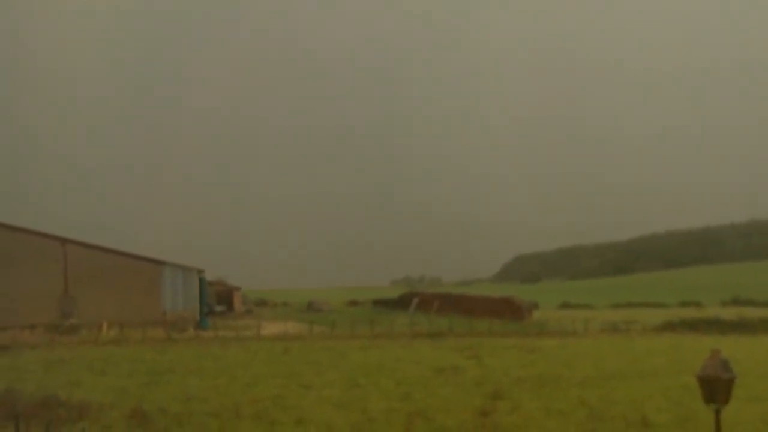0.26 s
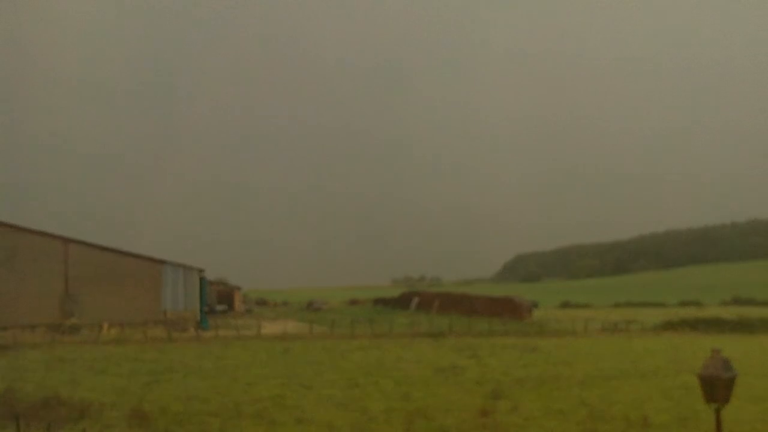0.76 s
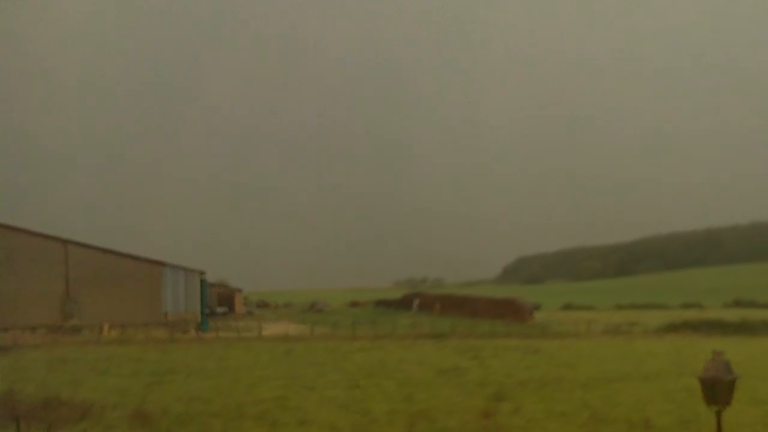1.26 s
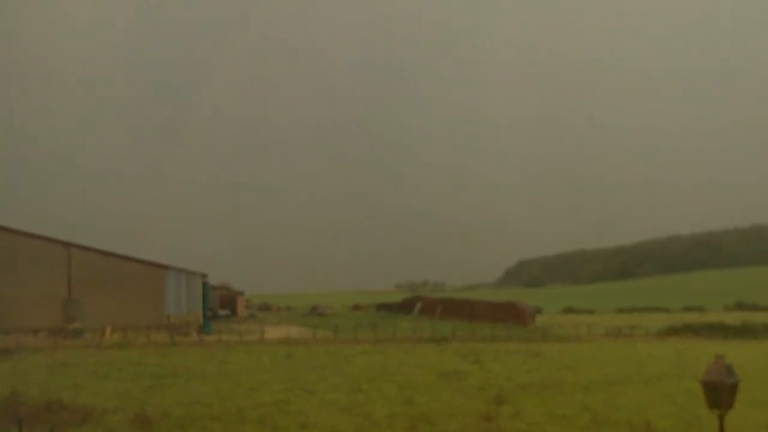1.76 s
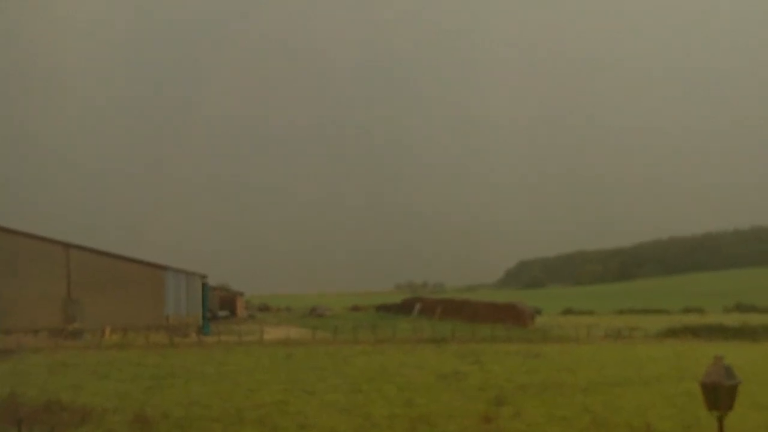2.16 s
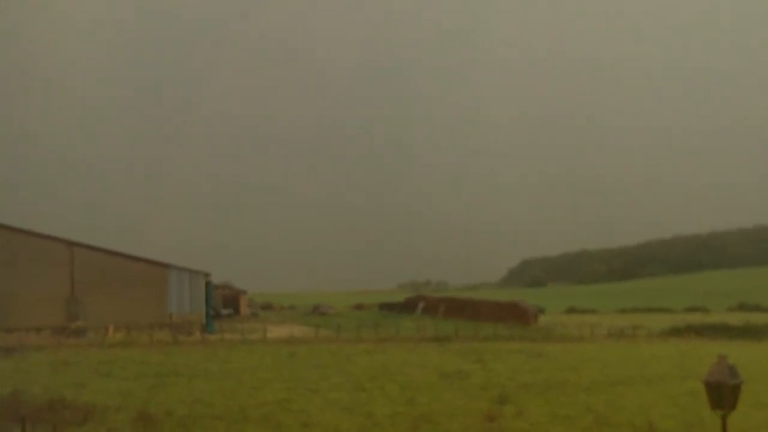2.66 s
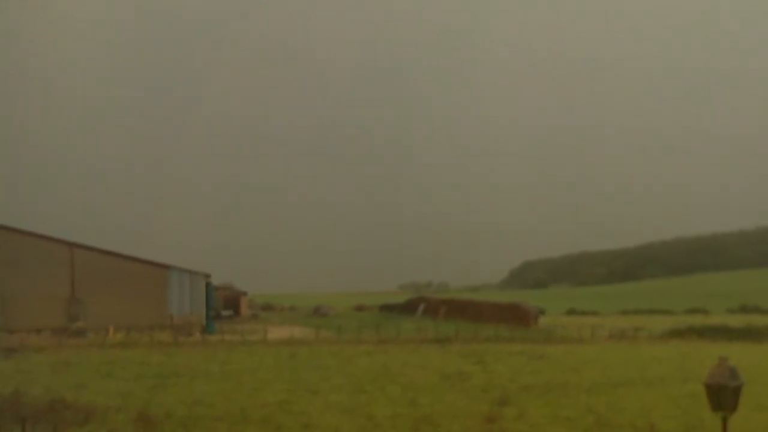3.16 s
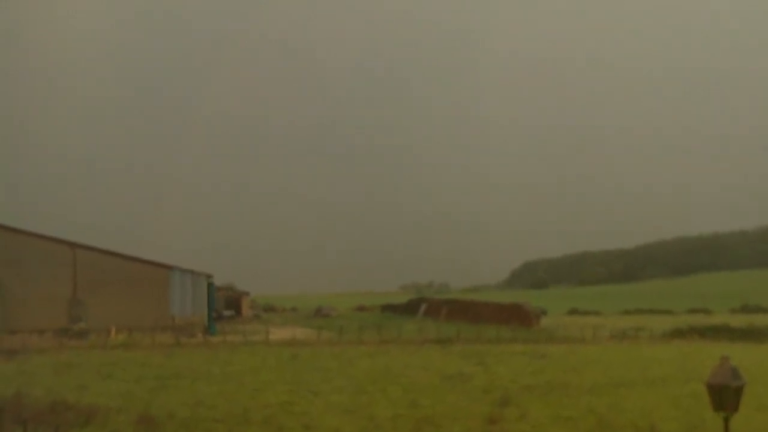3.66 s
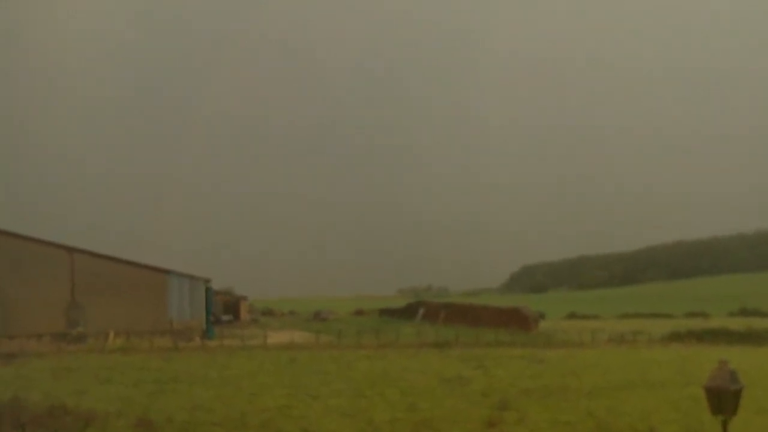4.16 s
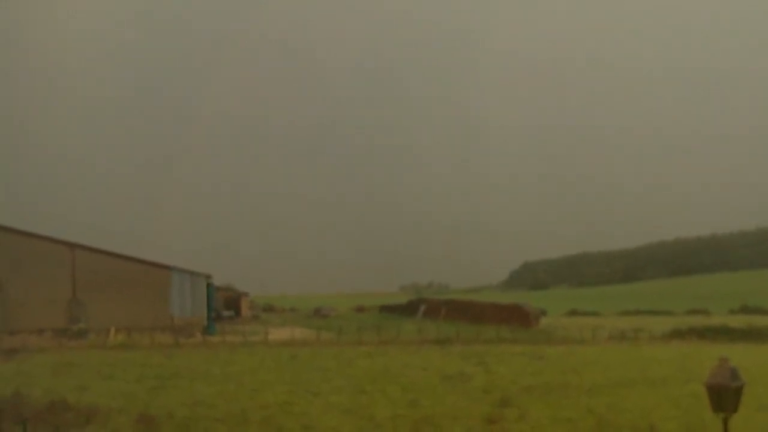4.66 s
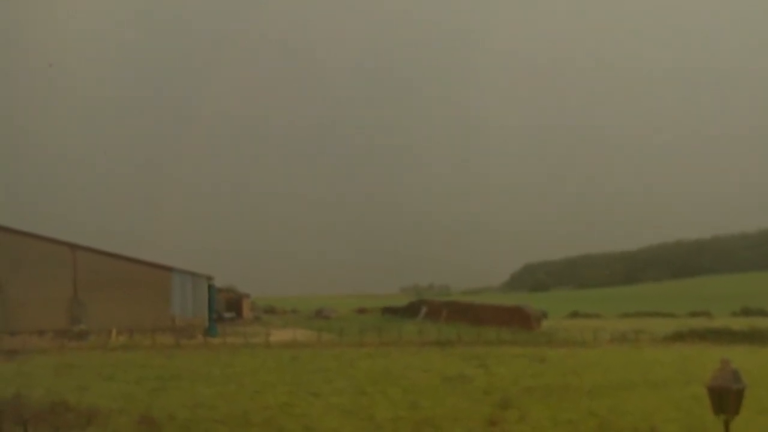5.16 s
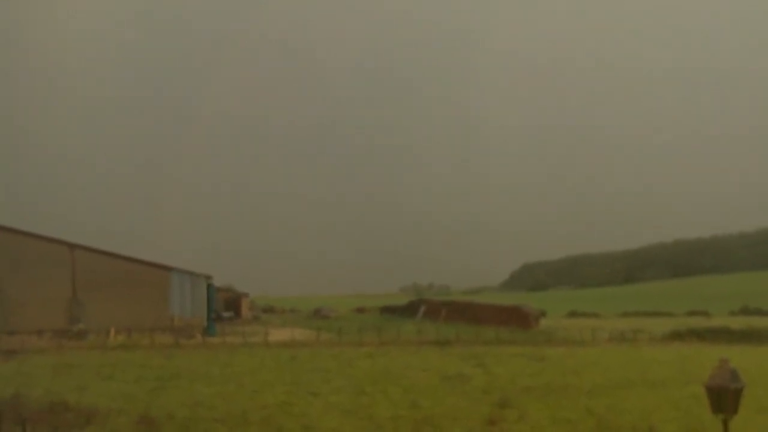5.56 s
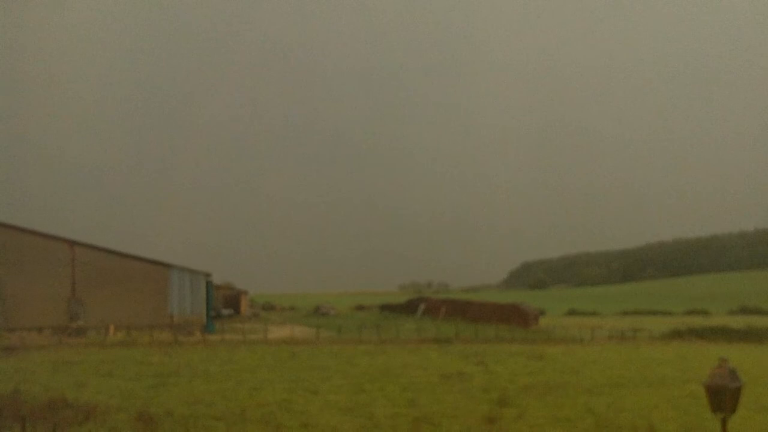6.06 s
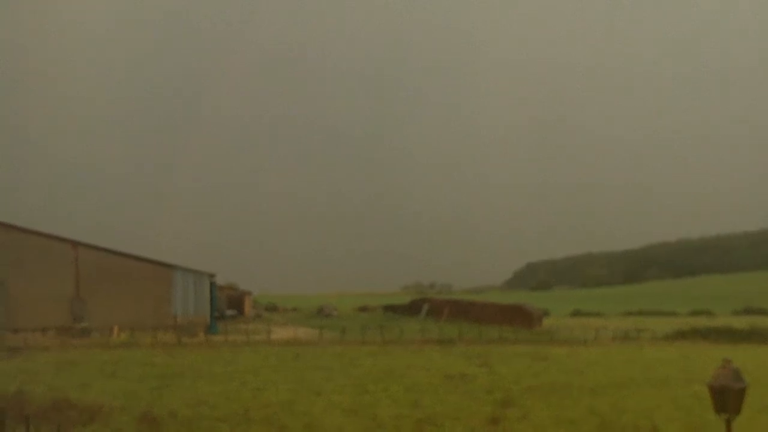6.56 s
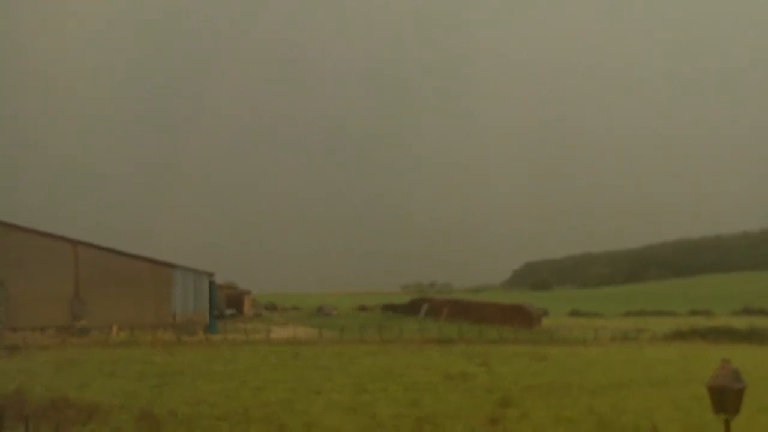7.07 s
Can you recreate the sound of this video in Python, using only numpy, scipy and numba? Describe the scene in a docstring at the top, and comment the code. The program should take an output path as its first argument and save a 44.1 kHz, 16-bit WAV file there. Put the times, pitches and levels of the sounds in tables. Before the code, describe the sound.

Under a farmland shelter, big drops fall from the roof edge and splash with bright ticks and small plops, echoing briefly off near walls. Behind them is the constant patter and hiss of heavy rain. Distant thunder comes and goes, first softly, then in a stronger roll with several deep booms. Gusts rumble on the microphone, which takes a quick double bump just before the end.

```python
"""Under a shelter in the fields, in heavy rain, heard through one small microphone. Large drips and a
patter of small drops splash close by, each a tick, a spray and a plop thrown back by near walls, over
the hiss of the fields. Thunder rolls in, smeared by the hills, and booms in the shelter. Wind buffets
the microphone, and near the end something bumps its body."""
import sys
import numpy as np
from scipy import signal
from scipy.fft import rfft, irfft
from scipy.io import wavfile
from scipy.ndimage import uniform_filter1d
from numba import njit

SR = 44100
rng = np.random.default_rng(int(sys.argv[2]) if len(sys.argv) > 2 else 0)


def to_wav(s):
    """Save 16-bit WAV."""
    ch = np.atleast_2d(s).T  # columns
    pcm = np.round(np.clip(ch, -1, 1) * 32767)  # PCM
    wavfile.write(sys.argv[1], SR, pcm.astype(np.int16))


N = 323253


# Large drips close by. Each row: start in seconds, level of the bright tick in dB, airy spray and
# dull plop in dB against the tick, plop pitch in Hz.
DRIPS = [(0.2942, -18.5, -4, -2.5, 2800), (0.3257, -5.5, -16, -38, 2160), (0.37, -22, 0, -0.5, 2920),
         (0.508, -23.5, -0.5, -20, 2220), (0.621, -24.5, -0.5, -10, 1880), (0.6578, -18, -10, -20, 1840),
         (0.705, -29, -8, 10, 2160), (0.7552, -19, -10, -13, 1890), (0.937, -17.5, -10, -5, 3980),
         (1.0041, -20.5, -1.5, -7, 3710), (1.1959, -23.5, 1, 1, 2270), (1.295, -24.5, 3.5, 1, 2250),
         (1.4803, -14.5, -5.5, -10, 3000), (1.5342, -13, -12, -11, 4140), (1.5522, -11, -4.5, -4, 2300),
         (1.668, -23, 3, -17, 1900), (1.874, -21, -11, -14, 2240), (1.9797, -27, 3.5, 6.5, 2380),
         (2.2967, -20.5, -3, -11, 2100), (2.6781, -13, -10, -12, 2860), (2.7214, -22, -4, -3, 2180),
         (2.812, -21, -12, -1.5, 2170), (2.9485, -18, -5, -30, 2730), (3.065, -26, -4, -2, 2190),
         (3.2808, -29.5, -10, 9, 2600), (3.368, -14.5, -11, -23, 2720), (3.385, -12, -19, -30, 1840),
         (3.4833, -23.5, -11, 4.5, 2920), (3.817, -20.5, 0, 1, 2820), (3.929, -25, -1.5, -2, 4110),
         (4.134, -8, -37, -37, 4290), (4.387, -20.5, -13.5, -2, 2220), (4.6011, -22, -4, -2, 3770),
         (4.7202, -17.5, -4.5, -7, 2380), (4.9507, -22, -7, 6, 2420), (5.0483, -22, 1, -8, 2400),
         (5.251, -21.5, -0.5, -18, 3860), (5.2976, -22, 2.5, 6.5, 3000), (5.559, -26.5, 10, -27, 2360),
         (5.7218, -24.5, -2, 4, 2270), (5.7826, -15, -12, -5, 4400), (5.805, -15, -4.5, -4, 3340),
         (5.814, -12.5, -6.5, -8, 3500), (6.031, -23, 3, -17, 1860), (6.141, -19.5, -5, 1, 2410),
         (6.1947, -21.5, 2, 1, 2200), (6.252, -19.5, -1, -1, 2460), (6.284, -15.5, -9.5, -11, 4200),
         (6.4269, -18, -4, -1, 2420), (6.4455, -14, -24, -19, 2710), (6.491, -17, -10, -20, 1900),
         (6.5536, -23.5, 8, 7, 2620), (6.9362, -16.5, -11, -7.5, 2800), (7.2524, -16.5, -15, -25, 2730)]

def drips():
    """Large drops fall from the edge of the roof and splash."""
    return splashes(*np.transpose(DRIPS), spray_ms=1.5)


# How the rain surges and eases. Each row: time in seconds, strength in dB.
RAIN_STRENGTH = [(0, -35), (.49, -38.5), (.68, -33.5), (.8, -39), (1.03, -32.5), (1.16, -41), (1.3, -33),
                 (1.4, -36), (1.56, -37.5), (1.75, -38.5), (1.82, -35), (2.18, -39), (2.66, -36),
                 (2.79, -38), (3.45, -35), (3.56, -38.5), (3.82, -37.5), (4.1, -40), (4.74, -37),
                 (4.9, -39.5), (5.1, -37), (5.7, -38), (5.85, -36), (6.45, -34.5), (6.66, -37),
                 (7.33, -37.5)]

def patter(count=2600):
    """Many small drops splash at random, louder as the rain surges."""
    strength_db, = curves(RAIN_STRENGTH)
    when, big, airy, dull, pitch = rng.random((count, 5)).T
    db = np.minimum(-3.2 * np.log(1 - big), 8.5)  # mostly faint, the loudest capped
    drops = splashes(when * N / SR, db, spray_db=-14 + 26 * airy, plop_db=-18 + 20 * dull,
                     plop_hz=1800 * 2 ** (1.1 * pitch), spray_ms=.3)
    return undb(strength_db) * level(drops, -2.25)


# The colour of spraying water. Each row: frequency in Hz, gain in dB.
SPLASH_COLOUR = [(300, -35.5), (500, -39), (940, -7.5), (1300, -10), (2100, -2), (3400, -5), (4600, -5),
                 (6400, 2), (7300, -1.5), (8700, -13.5), (9800, -5.5), (11500, -9.5), (13200, -20),
                 (15700, -20.5)]
# Slaps off the near walls. Each row: typical delay in milliseconds, level in dB against the splash.
WALL_ECHOES = [(3.1, -2), (5.8, -8), (8.7, -12), (11.6, -13)]

def splashes(s, db, spray_db, plop_db, plop_hz, spray_ms):
    """Each drop ticks, throws a short spray and a dull plop; the walls repeat it from where it fell."""
    chance = rng.random((len(s), 12))
    place = 1 + .2 * (chance[:, :1] - .5)
    lag_ms, echo_db = np.transpose([(0.0012, 0.0091)] + WALL_ECHOES)  # direct sound first
    when = s[:, None] + place * lag_ms / 1000
    size = undb(db[:, None] + echo_db)
    # droplets land a little later with either sign, which gives every splash its own colour
    late_s = -np.log(1 - chance[:, None, 1:6]) * spray_ms / 1000
    spray_size = size * undb(spray_db[:, None] + 0.12 * echo_db)  # wet walls swallow more spray than tick
    droplet_size = spray_size[..., None] * (2 * chance[:, None, 6:11] - 1)
    droplet = response(SPLASH_COLOUR)
    spray = through(train(when[..., None] + late_s, droplet_size), droplet / np.max(np.abs(droplet)))
    tick_hz = 6350 * 2 ** (0.46 * (chance[:, 11:] - .5))
    wall_detune = 2 ** (0.11 * rng.standard_normal(when.shape))  # every wall colours its echo
    hz = np.array([tick_hz, plop_hz[:, None]]) * wall_detune
    decay_cycles = np.array([3.0, 2.1])[:, None, None]  # tick, plop
    decay = hz / SR / decay_cycles
    sizes = np.array([size, size * undb(plop_db)[:, None]])
    body = rings(np.tile(when.ravel(), 2) * SR, hz.ravel(), decay.ravel(), sizes.ravel(), count=N)
    # the blow is not sharp enough for the top, and such small drops push almost no bass
    body = filtered(body, "low", 8000, order=4)
    return filtered(body + spray, "high", 1750, order=6)


def shelter(x, t60_s=0.089, tail_db=-10.5):
    """The shelter adds a short diffuse tail to each splash."""
    t = np.arange(SR // 5) / SR
    fade_in = np.clip(t / 0.004, 0, 1)
    tail = rng.standard_normal(len(t)) * np.exp(-np.log(1000) * t / t60_s) * fade_in
    return x + undb(tail_db) * through(x, tail / np.sqrt(np.sum(tail ** 2)))


# Rolls of thunder. Each row: arrival in seconds, swell time in seconds, relative levels of the deep
# rumble, upper rumble and roar in dB, fade in dB per second.
ROLLS = [(-.6, 0.57, -45.5, -46.5, -60.5, 8.5), (1.97, 0.39, -34, -36, -67, 7.5),
         (3.3, 0.05, -40.5, -47, -52.5, 4), (4.42, 0.38, -29.5, -26.5, -36.5, 8),
         (4.6, 0.48, -31, -27, -33.5, 12), (6.15, 0.15, -43, -39, -46, 3.5)]
# Single booms inside the rolls. Each row: peak time in seconds, relative deep and upper levels in dB.
BOOMS = [(2.15, -36.5, -45), (2.35, -39, -50), (3.62, -36, -57), (4.54, -35, -57), (4.76, -26, -33),
         (4.98, -21.5, -24), (5.22, -41, -21.5), (5.34, -25.5, -40), (5.46, -43, -27.5), (6.37, -42, -35)]
# The far storm that never stops: relative levels of deep rumble, upper rumble and roar in dB.
FAR_STORM_DB = [-52.5, -59, -57]

def rolls(swell_db=18, boom_s=0.087):
    """Envelopes of the thunder's three layers: each roll swells, then dies away evenly in dB."""
    t = np.arange(N) / SR
    power = undb(2 * np.array(FAR_STORM_DB))[:, None] + np.zeros(N)
    for s, swell_s, *db, fade_db_per_s in ROLLS:
        past_peak_s = t - s - swell_s
        shape_db = np.where(past_peak_s < 0, swell_db / swell_s, -fade_db_per_s) * past_peak_s
        power = power + undb(2 * np.array(db))[:, None] * undb(2 * shape_db)
    s, deep_db, upper_db = np.transpose(BOOMS)
    return np.sqrt(power + [swells(s, deep_db, boom_s), swells(s, upper_db, boom_s), np.zeros(N)])


# The colours of the low rumble and of the roar above it. Each row: frequency in Hz, gain in dB.
RUMBLE_COLOUR = [(24, -24), (40, -3.5), (114, 2.5), (150, -2.5), (174, 1.5), (226, -6.5), (314, -25),
                 (500, -36.5), (650, -40), (1100, -120)]
ROAR_COLOUR = [(180, -34), (300, -0.5), (349, -6), (522, -6), (576, -8.5), (659, -3), (931, 0), (1250, -13),
               (1800, -17), (2340, -45), (3960, -120)]
# Boomy resonances of the shelter. Each row: pitch in Hz, gain in dB, seconds to fade by 60 dB.
SHELTER_MODES = [(98.3, -2, 0.22), (127, 0, 0.21), (181, -4, 0.13), (692, -1.5, 0.15), (928.5, -1, 0.37)]

def thunder(count=4000):
    """Pulses from all along the lightning channel arrive scattered; hills smear them, the shelter rings."""
    when, big, sign = rng.random((count, 3)).T
    pulses = train(when * N / SR, np.sign(sign - .5) * undb(-1.5 * np.log(1 - big)))
    rumble = through(pulses, response(RUMBLE_COLOUR))
    deep = even(filtered(rumble, "low", 135, order=3), over_s=0.037)
    upper = even(filtered(rumble, "high", 135, order=3), over_s=0.11)
    roar = level(noise(ROAR_COLOUR) * undb(0.37 * walk(25)), 0)
    sky = np.sum(rolls() * [deep, upper, roar], axis=0)
    hz, db, t60 = np.transpose(SHELTER_MODES)
    decay = np.log(1000) / t60 / SR
    ring = rings(0 * hz, hz, decay, 2 * decay * undb(db), count=SR // 2)
    return undb(-1.0) * (sky + through(sky, ring))


# Hollows of the shelter that the hiss rings. Each row: pitch in Hz, relative level in dB.
HOLLOWS = [(912, -27), (1375, -22), (1845, -12), (2335, -36), (2730, -37), (3030, -22), (4080, -19.5),
           (6390, -14)]

def hiss(field_db=-43.5, hollow_t60_s=.045):
    """Rain on the fields blurs into a steady hiss, lifted by each surge and each drip's scattered water."""
    hz, hollow_db = np.transpose(HOLLOWS)
    decay = np.full(len(hz), np.log(1000) / hollow_t60_s / SR)
    hollows = rings(0 * hz, hz, decay, np.sqrt(4 * decay) * undb(hollow_db), count=SR // 4)
    wash = level(noise(SPLASH_COLOUR), 0)
    # dull, bright and airy parts come from different ground and waver on their own
    dull = filtered(wash, "low", 4200, order=2)
    air = filtered(wash, "high", 8600, order=2)
    bed = undb(0.61 * walk(20)) * dull + undb(0.5 * walk(28)) * (wash - dull)
    bed += (undb(.6 * walk(18)) - 1) * air
    bed += through(rng.standard_normal(N), hollows)
    strength_db, = curves(RAIN_STRENGTH)
    power = undb(2 * (strength_db - 5)) + undb(2 * field_db) + scatter()
    return np.sqrt(power) * level(bed, 0)


def scatter(gain_db=-14.5, rise_s=0.007, fall_s=0.014):
    """Power of the short wet rustle as each drip scatters water around it."""
    s, tick_db, spray_db = np.transpose(DRIPS)[:3]
    t = np.arange(SR // 4) / SR
    envelope = (1 - np.exp(-t / rise_s)) * np.exp(-t / fall_s)
    return through(train(s, undb(2 * (tick_db + spray_db + gain_db))), envelope)


# Gusts on the microphone. Each row: peak time in seconds, level in dB, length in seconds.
GUSTS = [(1.43, -40, 0.46), (3.04, -30.5, 0.093), (3.73, -37.5, 0.14), (4.09, -40, 0.12), (4.78, -32, 0.22),
         (5.1, -30, 0.35)]
# The bassy colour of the buffeting. Each row: frequency in Hz, gain in dB.
BUFFET_COLOUR = [(10, -8.5), (22, 11), (42, 0.5), (60, -13), (150, -28.5), (300, -28), (700, -120)]

def wind(breeze_db=-40.5):
    """Slow eddies push on the microphone's membrane: gusts over a steady breeze."""
    strength = np.sqrt(undb(2 * breeze_db) + swells(*np.transpose(GUSTS)))
    return strength * even(noise(BUFFET_COLOUR), over_s=0.063)


# Two quick knocks. Each row: start in seconds, direction as a sign, blow in dB, contact in milliseconds.
BUMPS = [(7.172, 1, -5, 8.6), (7.22, -1, 2, 1.7)]
# What rings when the microphone is knocked. Each row: pitch in Hz, gain in dB, seconds to fade by
# 60 dB, direction of motion as a sign.
BODY_MODES = [(28.8, -20.5, 0.65, 1), (51.5, -19.5, 0.41, -1), (101, -11, 0.036, 1), (460, -34, 0.028, 1)]

def bumps():
    """Knocks on the body of the microphone; a longer contact rings only the low modes."""
    hz, db, t60, sense = np.transpose(BODY_MODES)
    ring = rings(0 * hz, hz, np.log(1000) / t60 / SR, np.sign(sense) * undb(db), count=SR // 2)
    push = np.zeros(N)
    for s, direction, blow_db, contact_ms in BUMPS:
        start = int(s * SR)
        shape = np.hanning(int(contact_ms * SR / 1000))
        push[start:start + len(shape)] = np.sign(direction) * undb(blow_db) * shape / shape.sum()
    return through(push, ring)


def undb(db):
    """Decibels to amplitude; twice the decibels gives power."""
    return 10 ** (np.asarray(db) / 20)


def level(x, db):
    """Set a sound's RMS level."""
    return x * undb(db) / np.sqrt(np.mean(x ** 2))


def even(x, over_s):
    """Flatten the running level of a noise to 1, so that only its envelope makes it swell."""
    width = int(over_s * SR)
    return x / np.sqrt(uniform_filter1d(uniform_filter1d(x ** 2, width), width))


def swells(s, db, length_s):
    """Power of smooth bell-shaped swells centred at the given times."""
    t = np.arange(N) / SR
    return sum(undb(2 * peak_db) * np.exp(-(2 * (t - centre) / width) ** 2)
               for centre, peak_db, width in np.broadcast(s, db, length_s))


def curves(table):
    """Columns of a table, joined by straight lines at every sample."""
    s, *columns = np.transpose(table)
    return [np.interp(np.arange(N) / SR, s, c) for c in columns]


def walk(rate):
    """A smooth waver: random levels held 1 / rate seconds and slewed twice."""
    hold = int(SR / rate)
    steps = np.repeat(rng.standard_normal(N // hold + 1), hold)
    return 1.62 * uniform_filter1d(uniform_filter1d(steps, hold), hold)[:N]


def response(spectrum, size=8192):
    """Causal impulse response of (Hz, dB) points, from the cepstrum of the log gain."""
    hz, db = np.transpose(spectrum)
    bin_hz = np.arange(size // 2 + 1) * SR / size
    log_gain = np.interp(np.log(bin_hz + 1), np.log(hz), db) * np.log(10) / 20
    cepstrum = irfft(log_gain)
    cepstrum[1:size // 2] *= 2
    cepstrum[size // 2 + 1:] = 0
    return irfft(np.exp(rfft(cepstrum)))[:size // 2] * np.hanning(size)[size // 2:]


def through(x, impulse_response):
    """Play a sound through an impulse response."""
    return signal.fftconvolve(x, impulse_response)[:N]


def noise(colour):
    """Steady noise of the given colour."""
    return through(rng.standard_normal(N), response(colour))


def filtered(x, kind, hz, order):
    """A low-pass or high-pass filter."""
    return signal.sosfilt(signal.butter(order, hz, kind, fs=SR, output="sos"), x)


def train(s, size):
    """Impulses of the given sizes at the given times."""
    return np.bincount(np.clip((s * SR).astype(int), 0, N - 1).ravel(), size.ravel(), N)


@njit
def rings(start, hz, decay, size, count):
    """A damped sine for each event; start is in samples, decay per sample."""
    out = np.zeros(count)
    for k in range(len(start)):
        phasor = size[k] + 0j
        step = np.exp(2j * np.pi * hz[k] / SR - decay[k])
        for i in range(int(start[k]), min(count, int(start[k] + 7 / decay[k]))):
            out[i] += phasor.imag
            phasor *= step
    return out


def scene():
    """Splashes in the shelter over hiss, thunder, wind and bumps, the same in both channels."""
    small_drops, fields = patter(), hiss()
    mix = shelter(drips() + small_drops) + fields + thunder() + wind() + bumps()
    return np.tile(mix, (2, 1))


# The colour of a faint steady hiss, different in each channel. Each row: frequency in Hz, gain in dB.
FAINT_HISS_COLOUR = [(30, 13), (120, -13), (250, 11.5), (1100, 6), (2400, -40), (8000, -18), (11000, -6),
                     (12500, 13), (15700, 8)]

def record(dry, top_hz=15720):
    """A faint steady hiss, different in each channel, lies underneath; the top is cut steeply."""
    faint_hiss = np.array([noise(FAINT_HISS_COLOUR) for _ in dry])
    top_cut = signal.ellip(12, .2, 60, top_hz, fs=SR, output="sos")
    return signal.sosfilt(top_cut, dry + level(faint_hiss, -60.5))


dry = scene()
out = record(dry)
to_wav(out)
```